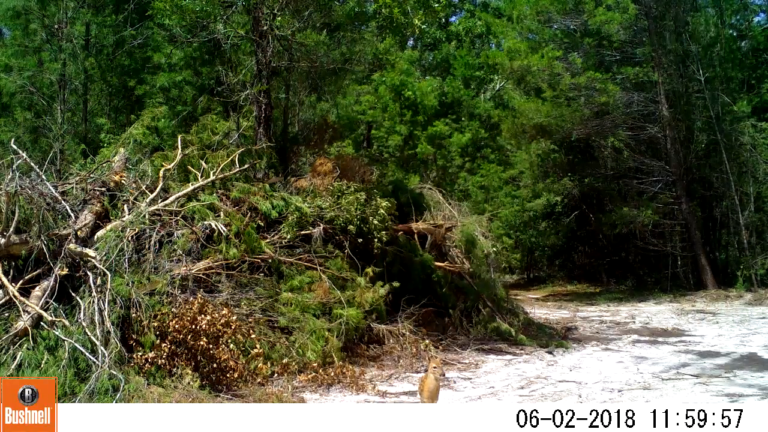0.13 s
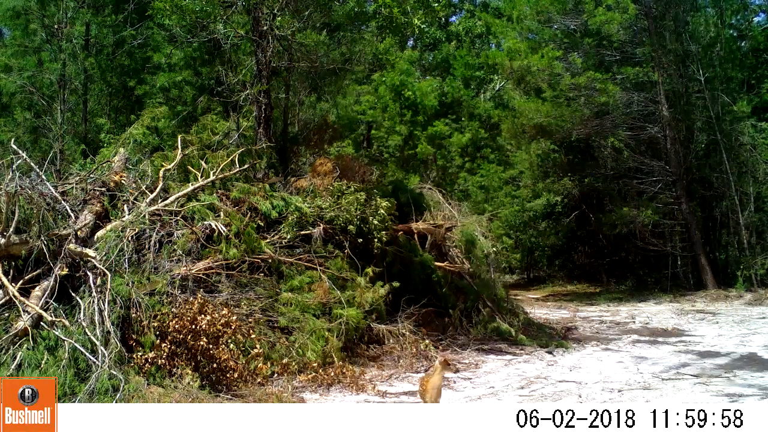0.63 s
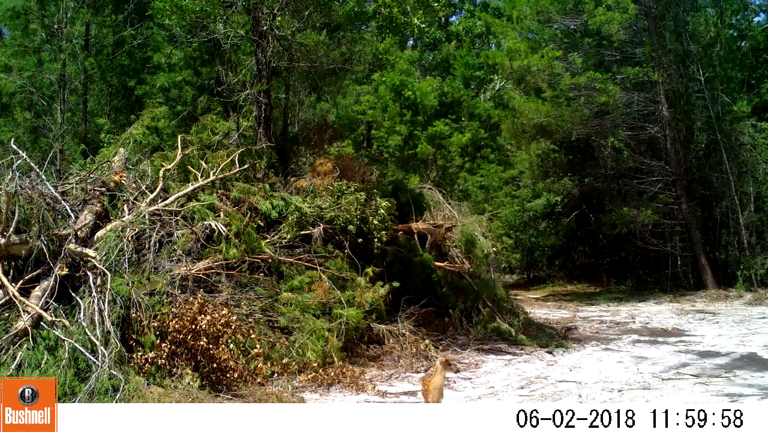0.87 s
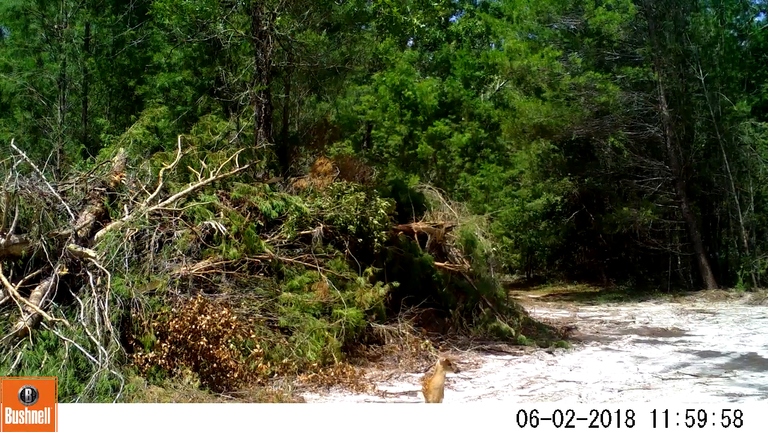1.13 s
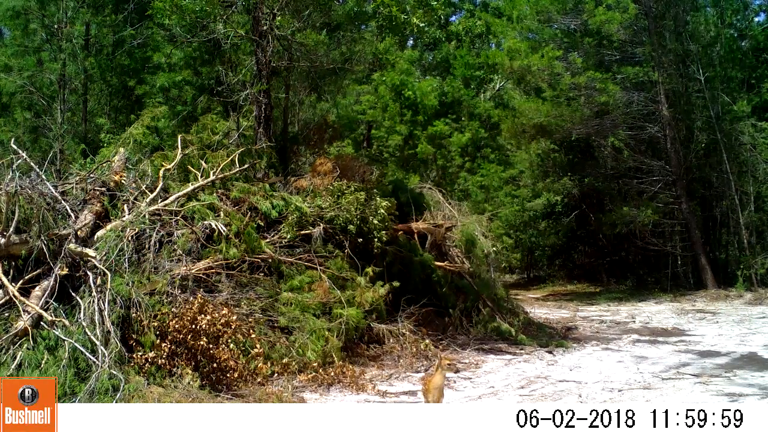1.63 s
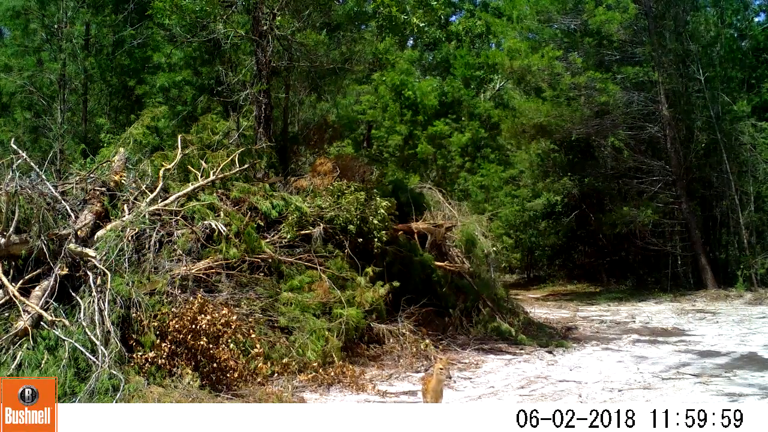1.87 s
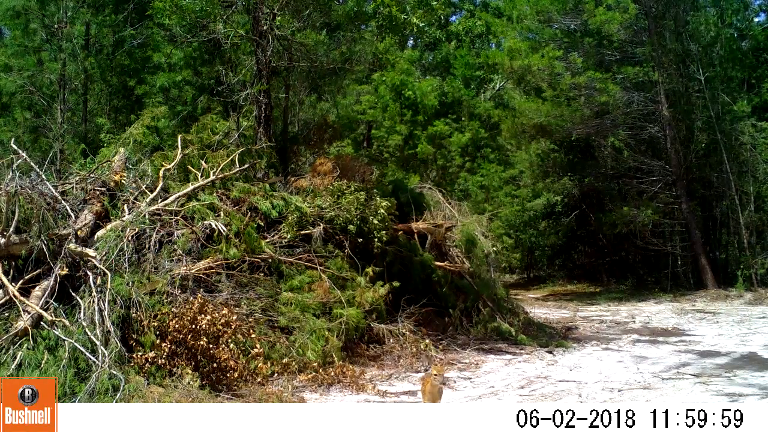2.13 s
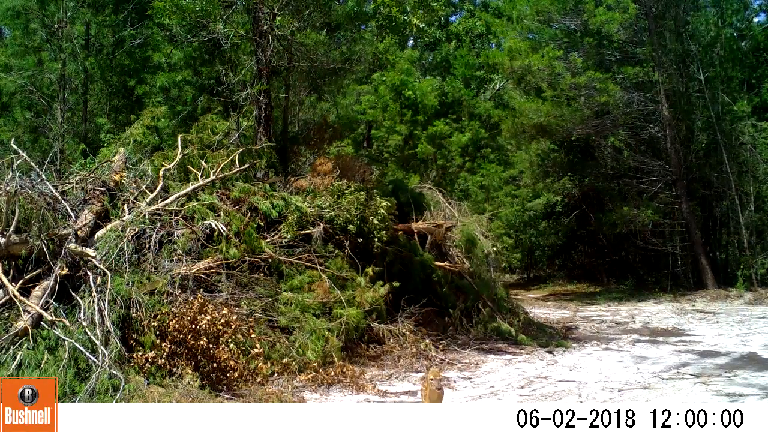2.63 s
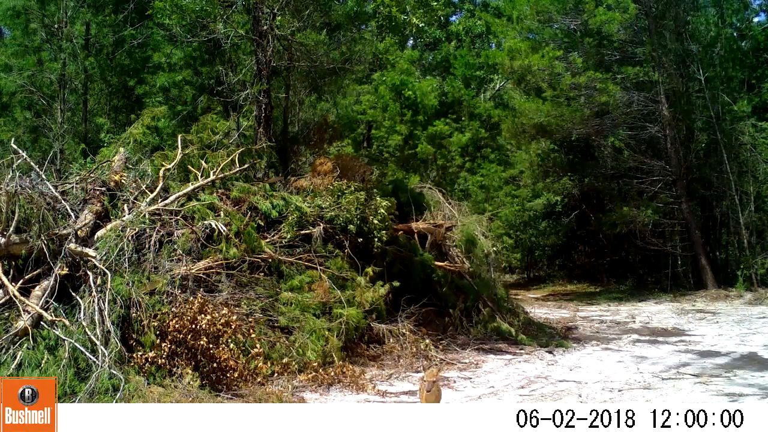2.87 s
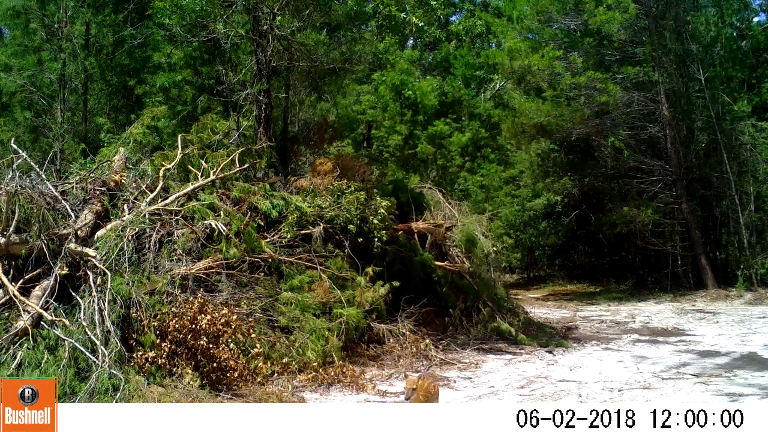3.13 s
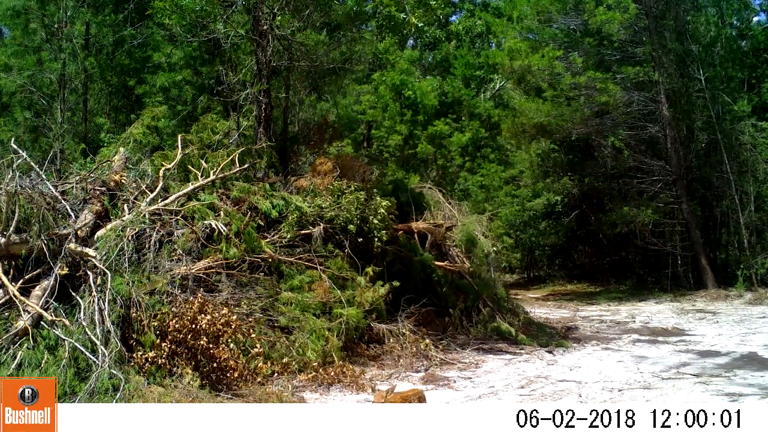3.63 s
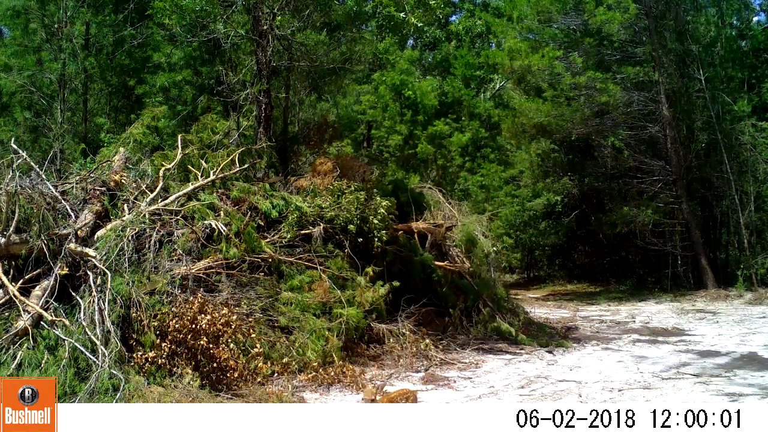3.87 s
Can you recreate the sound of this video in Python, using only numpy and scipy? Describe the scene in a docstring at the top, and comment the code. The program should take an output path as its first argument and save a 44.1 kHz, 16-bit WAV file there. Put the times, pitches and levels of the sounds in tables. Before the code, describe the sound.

A cricket trills three times in high, fast-pulsing bursts over low camera rumble, thudding and hiss.

```python
"""A cricket trills three times near a small outdoor camera in a pine wood: trains of falling-tone strokes,
echoed by ground and trees. Short dry rasps (noise bursts) and tiny chirps (gliding sines) punctuate them.
Behind lie an insect chorus (shaped noise) and far crickets (throbbing narrow noise). The camera adds rumble
and hiss (shaped noise) and a fast low thudding (filtered pulses), wind adds deep bass; it stops near the end."""
import sys
import numpy as np
from scipy import signal
from scipy.fft import rfft, irfft
from scipy.io import wavfile
from scipy.ndimage import uniform_filter1d

SR = 44100
rng = np.random.default_rng(int(sys.argv[2]) if len(sys.argv) > 2 else 0)


def to_linear_factor(level_db):
    """Convert decibel levels (scalar or array-like) to linear amplitude factors."""
    exponent = np.asarray(level_db, float) / 20
    return 10 ** exponent


def wav_record(signal):
    """Record a signal, one row per channel, as 16-bit PCM in the file named by sys.argv[1]."""
    frames = np.transpose(np.atleast_2d(signal))
    bounded = np.clip(frames, -1, 1)
    # unit amplitude maps onto the largest positive 16-bit level
    quanta = np.round(bounded * 32767).astype(np.int16)
    wavfile.write(sys.argv[1], SR, quanta)


N = 176400

# Near cricket's trills: first_stroke_s, last_stroke_s, full_level_db, pitch_hz, warm_up_s,
# second_lobe_delay_s, second_lobe_db, ground_echo_db
TRILLS = [(.0590, 1.0477, -42, 7120, .22, .0048, -4, -5), (1.6060, 2.3150, -40.5, 7165, .11, .0042, -7, -7),
          (2.8626, 3.6150, -39.5, 7170, .07, .0038, -10, -10)]
# Dry rasps: start_s, length_s, level_db
RASPS = [(.172, .035, -57), (.69, .02, -61), (.893, .02, -56), (1.30, .02, -61), (1.575, .03, -56),
         (1.888, .026, -52), (1.918, .02, -51), (2.2, .03, -59), (2.535, .012, -58), (2.58, .02, -60),
         (2.828, .026, -49), (3.19, .03, -59), (3.81, .03, -63)]
# Rasp spectrum: freq_hz, density_db_per_hz
RASP_SPECTRUM = [(3500, -22), (5100, -8), (6100, 0), (7500, -4), (8500, -6), (9800, -6), (11000, -20)]
# Tiny chirps: start_s, length_s, peak_db, start_hz, end_hz
CHIRPS = [(1.108, .014, -58, 9400, 9000), (1.187, .014, -46, 7900, 7100), (1.208, .012, -53, 7400, 7050),
          (1.331, .014, -53, 6050, 5900), (2.585, .016, -58, 9400, 9200)]
# Broad insect buzz: time_s, level_db
CHORUS_LEVEL = [(0.0, -59), (0.46, -60), (0.74, -54.5), (1.05, -61), (1.26, -60.5), (1.7, -55.5),
                (2.42, -60), (2.71, -55.5), (3.01, -59.5), (3.28, -58.5), (3.54, -53.5), (3.76, -59.5),
                (3.78, -62), (3.85, -103)]
# Insect buzz spectrum: freq_hz, density_db_per_hz
CHORUS_SPECTRUM = [(4500, -22), (5500, -8), (6400, 0), (7100, -2), (7900, -5), (9000, -11), (11000, -25)]
# Far crickets of the same kind: time_s, level_db
FAR_LEVEL = [(0, -70), (1.04, -70), (1.07, -61), (1.12, -70), (1.17, -72), (1.21, -60), (1.27, -65),
             (1.4, -62), (1.55, -66), (1.7, -72), (2.28, -72), (2.33, -59), (2.45, -66), (2.55, -63),
             (2.8, -65), (2.9, -72), (3.58, -72), (3.64, -60), (3.75, -58), (3.79, -70), (4, -72)]
# The thudding slips late, then catches up: slip_s, delay_s
THUD_SLIPS = [(.72, 0.0054), (1.38, .010), (2.38, 0.0058), (3.08, 0.011), (3.69, 0.0059)]
# Soft wind pressure on the microphone: time_s, level_db
WIND_LEVEL = [(0, -41), (.4, -34.5), (.9, -42.5), (1.85, -47.5), (2.05, -28.5), (2.25, -42), (4, -50.5)]
# Wind spectrum: freq_hz, density_db_per_hz
WIND_SPECTRUM = [(8, -5.5), (20, -8), (35, 1.5), (60, -7.5), (120, -39)]
# Rumble and hiss spectrum: freq_hz, density_db_per_hz
HISS_SPECTRUM = [(15, -7.5), (30, -2), (60, -4.5), (130, -5.5), (300, -11), (700, -19), (1500, -29.5),
                 (3000, -37), (5000, -40), (9000, -44.5), (14000, -47)]

STROKE_PERIOD_S, GLIDE_HZ_PER_S = .021492, -38000
LOBE_SIGMA_S, OUTER_LOBE_OFFSET_S = .0013, .0033
EARLY_LOBE_DB, THIRD_LOBE_DB = -13, -6  # re main lobe, re second lobe
# A trill starts soft and flat, its late lobes less softened than the main one, all widened by a share
START_DB, START_LATE_DB, START_HZ, START_WIDEN = -17, -6, -30, 1.
UNEVEN_DB, UNEVEN_HZ, UNEVEN_S = 1., 20, .0003
GROUND_ECHO_S, WOOD_DB, WOOD_T60_S = .00474, -12, .16
RASP_CLICKS_PER_S, RASP_EDGE_S = 660, .0013
FAR_HZ, FAR_WIDTH_HZ, FAR_THROB_DEPTH = 7170, 340, .6
THUD_FIRST_S, THUD_PERIOD_S, CATCH_UP_S = .0245, .04495, .21
THUD_DB, THUD_UNEVEN_DB = -25.5, 4.
THUD_SIGMA_S, COUPLING_HZ = .0016, 30.6
HISS_DB, SWELL_DB, PATCH_DB = -35, .49, .5
STOP_S, STOP_FADE_S = 3.9285, .002


def evened(x):
    """Scales to rms 1."""
    return x / np.sqrt(np.mean(x ** 2) + 1e-20)


def curve(points):
    """Interpolates (time_s, value) rows linearly at every sample."""
    return np.interp(np.arange(N) / SR, *np.transpose(points))


def colour(x, spectrum):
    """Filters x by a (freq_hz, db) curve on a log-frequency axis, then scales to rms 1."""
    point_hz, point_db = np.transpose(spectrum)
    hz = np.fft.rfftfreq(len(x), 1 / SR)
    gain_db = np.interp(np.log(hz + 1), np.log(point_hz + 1), point_db, right=-120)
    return evened(irfft(rfft(x) * to_linear_factor(gain_db), len(x)))


def add(mix, start_s, sound):
    """Mixes a sound in at a time, cut at the end of the mix."""
    part = mix[round(start_s * SR):][:len(sound)]
    part += sound[:len(part)]


def wood_echo(x):
    """Trees scatter sound into a decaying noise tail."""
    tail_s = np.arange(SR // 4) / SR
    tail = rng.standard_normal(len(tail_s)) * to_linear_factor(-60 * tail_s / WOOD_T60_S)
    return to_linear_factor(WOOD_DB) * signal.oaconvolve(x, tail / np.linalg.norm(tail))[:N]


def cricket():
    """Near-even wing strokes, each a falling tone in four lobes, echoed by the ground and the trees."""
    out = np.zeros(N)
    t = np.arange(-300, 900) / SR
    echo_n = round(GROUND_ECHO_S * SR)
    for first_s, last_s, level_db, pitch_hz, warm_s, delay_s, second_db, echo_db in TRILLS:
        for stroke_s in np.arange(first_s, last_s + STROKE_PERIOD_S / 2, STROKE_PERIOD_S):
            r_level, r_late, r_delay, r_pitch, r_phase, r_time = rng.standard_normal(6)
            cold = np.exp(-(stroke_s - first_s) / warm_s)
            main_db = START_DB * cold
            late_db = second_db + START_LATE_DB * cold + UNEVEN_DB * r_late
            late_s = delay_s + UNEVEN_S * r_delay
            lobes = [(-OUTER_LOBE_OFFSET_S, main_db + EARLY_LOBE_DB),
                     (0, main_db),
                     (late_s, late_db),
                     (late_s + OUTER_LOBE_OFFSET_S, late_db + THIRD_LOBE_DB)]
            sigma_s = LOBE_SIGMA_S * (1 + START_WIDEN * cold)
            envelope = sum(to_linear_factor(db) * np.exp(-.5 * ((t - at_s) / sigma_s) ** 2) for at_s, db in lobes)
            hz = pitch_hz + START_HZ * cold + UNEVEN_HZ * r_pitch
            cycles = hz * t + GLIDE_HZ_PER_S * t ** 2 / 2 + r_phase
            stroke = to_linear_factor(level_db + UNEVEN_DB * r_level) * envelope * np.sin(2 * np.pi * cycles)
            stroke[echo_n:] += to_linear_factor(echo_db) * stroke[:-echo_n]
            add(out, stroke_s + t[0] + UNEVEN_S * r_time / 2, stroke)
    return out + wood_echo(out)


def rasps():
    """Bursts of dense scratchy clicks: coloured noise with random strong samples, gated."""
    click = rng.random(N) < RASP_CLICKS_PER_S / SR
    scratch = colour(rng.standard_normal(N) * (.3 + click), RASP_SPECTRUM)
    t = np.arange(N) / SR
    gate = np.zeros(N)
    for start_s, length_s, level_db in RASPS:
        edge_s = np.minimum(t - start_s, start_s + length_s - t)
        gate += to_linear_factor(level_db) * np.clip(edge_s / RASP_EDGE_S, 0, 1)
    return scratch * gate


def chirps():
    """Short falling whistles: sines under a Hann envelope, phase summed from the gliding pitch."""
    out = np.zeros(N)
    for start_s, length_s, peak_db, start_hz, end_hz in CHIRPS:
        n = round(length_s * SR)
        cycles = np.cumsum(np.linspace(start_hz, end_hz, n)) / SR
        add(out, start_s, to_linear_factor(peak_db) * np.hanning(n) * np.sin(2 * np.pi * cycles))
    return out


def chorus():
    """Many distant insects blur into a broad buzz of coloured noise."""
    return to_linear_factor(curve(CHORUS_LEVEL)) * colour(rng.standard_normal(N), CHORUS_SPECTRUM)


def far_crickets():
    """A blurred whistle, resonance-shaped noise, that still throbs at the stroke rate."""
    hz, t = np.fft.rfftfreq(N, 1 / SR), np.arange(N) / SR
    resonance = 1 / (1 + (2 * (hz - FAR_HZ) / FAR_WIDTH_HZ) ** 2)
    whistle = irfft(rfft(rng.standard_normal(N)) * resonance, N)
    throb = 1 + FAR_THROB_DEPTH * np.cos(2 * np.pi * (t / STROKE_PERIOD_S + rng.random()))
    return to_linear_factor(curve(FAR_LEVEL)) * evened(whistle * throb)


def thuds():
    """Short voltage dips in the camera that rebound through its coupling capacitor (a high-pass)."""
    even_s = np.arange(THUD_FIRST_S, N / SR - .1, THUD_PERIOD_S)
    lag_s = sum(delay_s * (even_s > slip_s) * np.exp(-abs(even_s - slip_s) / CATCH_UP_S)
                for slip_s, delay_s in THUD_SLIPS)
    thud_s = even_s + lag_s
    train = np.zeros(N)
    train[(thud_s * SR).astype(int)] = to_linear_factor(THUD_DB + THUD_UNEVEN_DB * rng.uniform(-.72, 1, len(thud_s)))
    pulse = np.exp(-.5 * (np.arange(-300, 301) / SR / THUD_SIGMA_S) ** 2)
    dips = -signal.oaconvolve(train, pulse, "same")
    return signal.lfilter([1, -1], [1, -np.exp(-2 * np.pi * COUPLING_HZ / SR)], dips)


def wind():
    """Soft wind pressure: slow lumps of the deepest bass."""
    return to_linear_factor(curve(WIND_LEVEL)) * colour(rng.standard_normal(N), WIND_SPECTRUM)


def hiss():
    """Rumble and hiss of air and amplifier: coloured noise with faint patches and a slow swell."""
    noise = colour(rng.standard_normal(N), HISS_SPECTRUM)
    _, frame_s, z = signal.stft(noise, SR, nperseg=1024, noverlap=768)
    patches = uniform_filter1d(rng.standard_normal(z.shape), 10, 0)  # across frequency
    patches = evened(uniform_filter1d(patches, 10, 1))  # across time
    swell = evened(uniform_filter1d(rng.standard_normal(len(frame_s)), 30))
    z = z * to_linear_factor(PATCH_DB * patches + SWELL_DB * swell)
    return to_linear_factor(HISS_DB) * evened(signal.istft(z, nperseg=1024, noverlap=768)[1][:N])


def scene():
    """All sources, one channel."""
    near = cricket() + rasps() + chirps()
    far = chorus() + far_crickets()
    return (near + far + thuds() + wind() + hiss())[None]


def top_cut(x):
    """Nothing passes above the cut-off."""
    return signal.sosfilt(signal.butter(12, 13970, fs=SR, output="sos"), x)


def record(dry):
    """The camera stops abruptly: a short linear fade to silence."""
    stop = np.clip((STOP_S - np.arange(N) / SR) / STOP_FADE_S, 0, 1)
    return top_cut(dry * stop)


dry = scene()
out = record(dry)
wav_record(out)
```